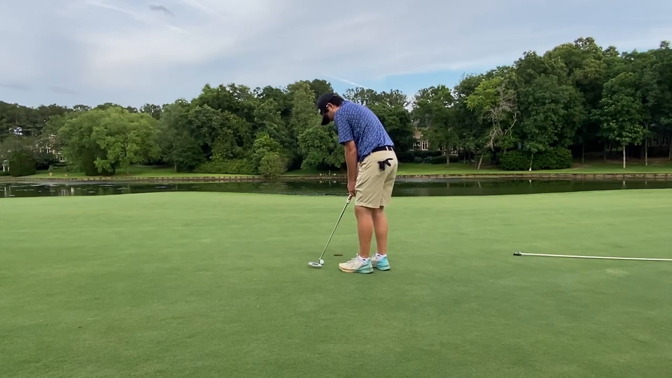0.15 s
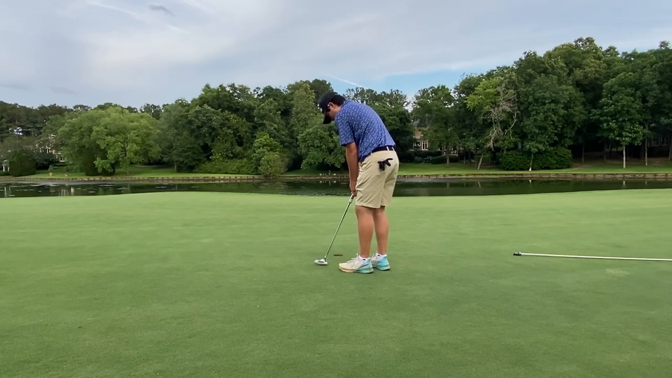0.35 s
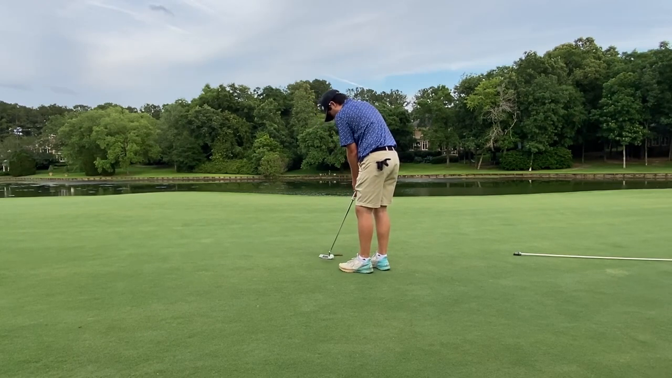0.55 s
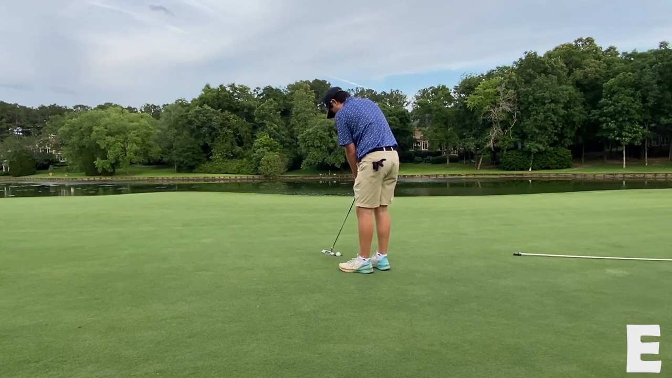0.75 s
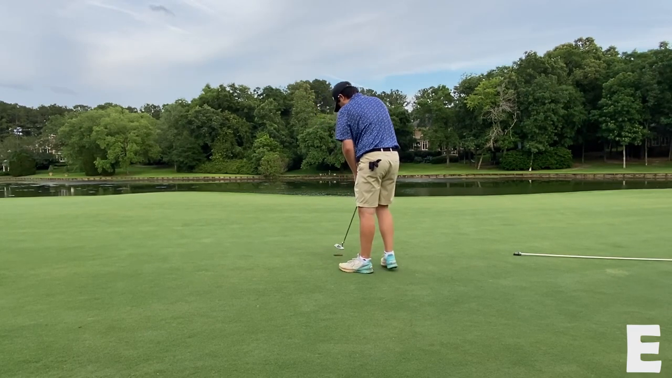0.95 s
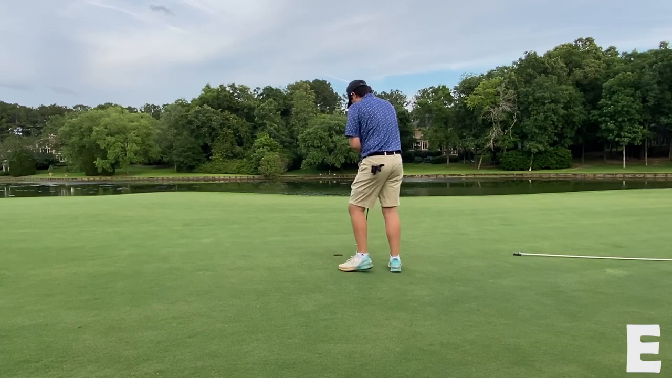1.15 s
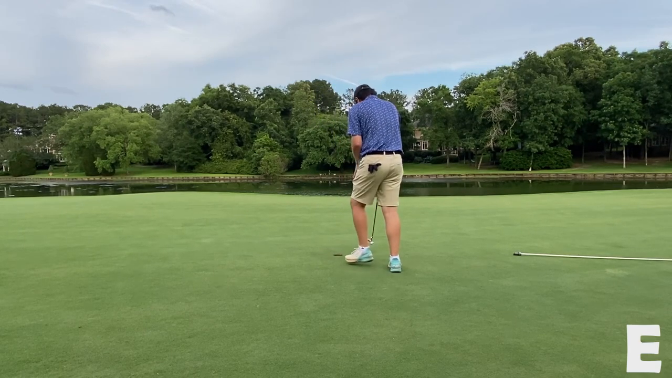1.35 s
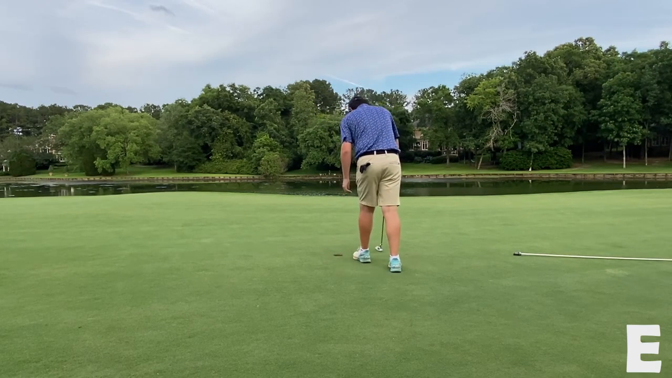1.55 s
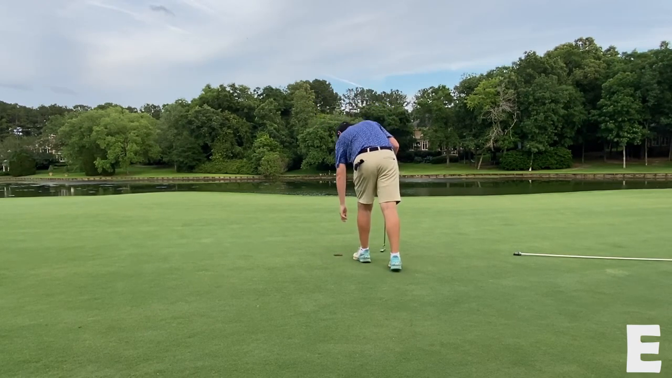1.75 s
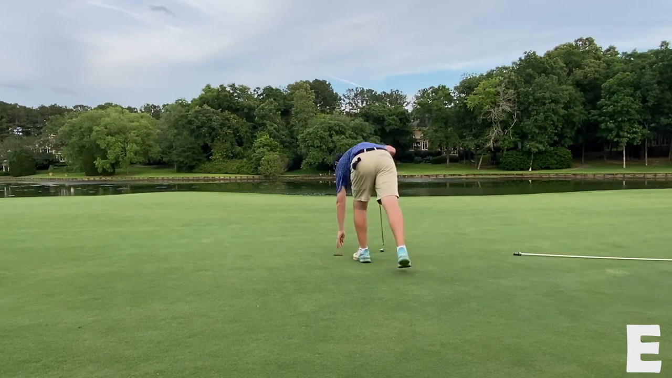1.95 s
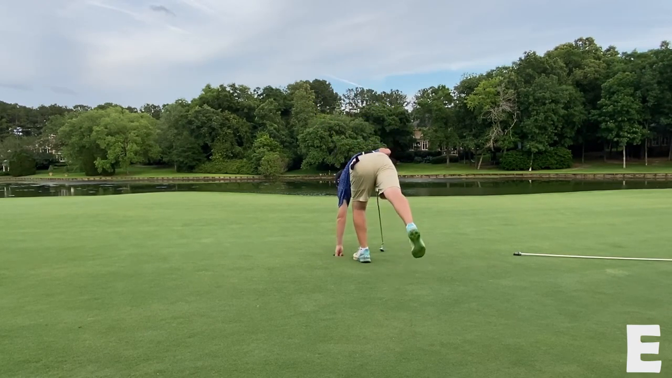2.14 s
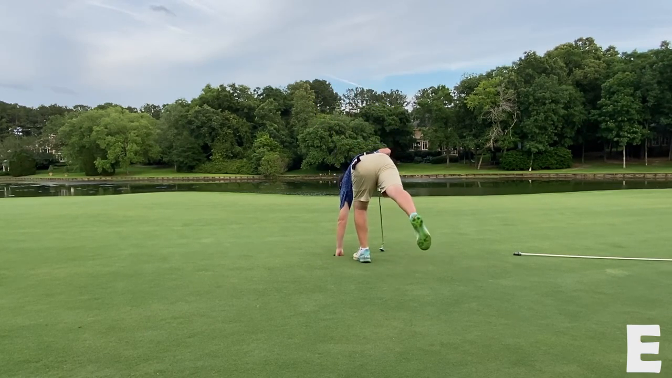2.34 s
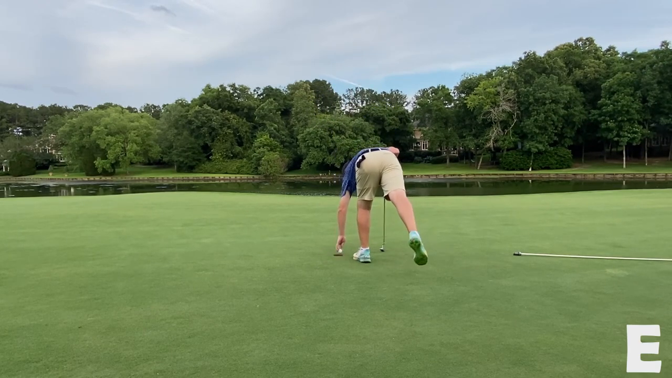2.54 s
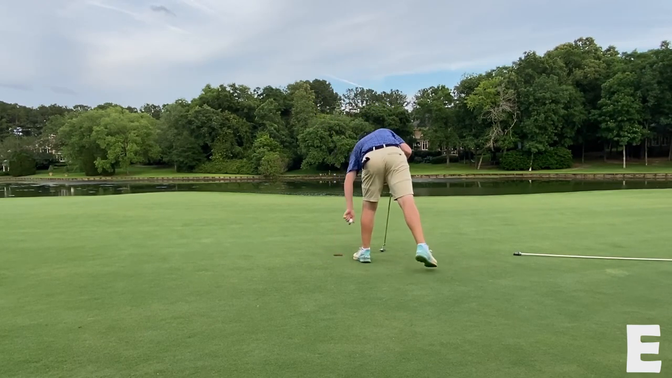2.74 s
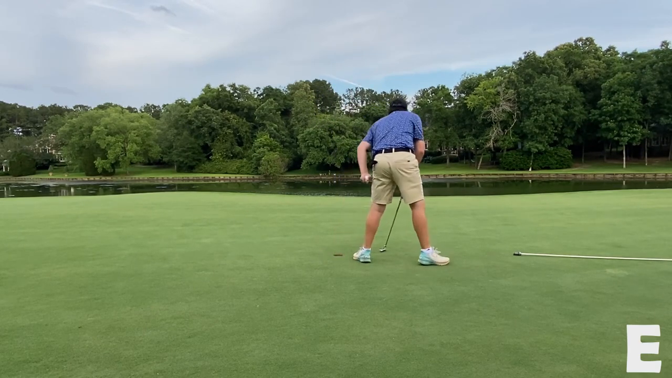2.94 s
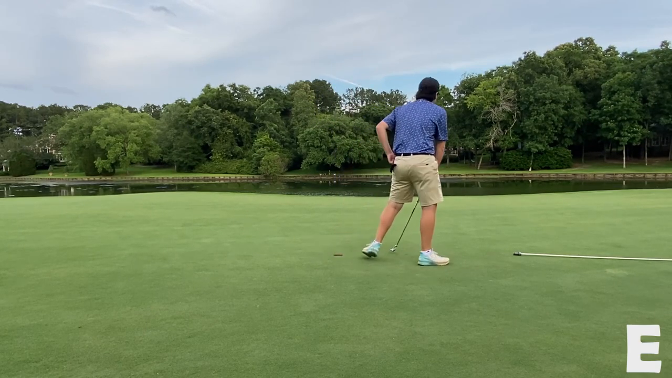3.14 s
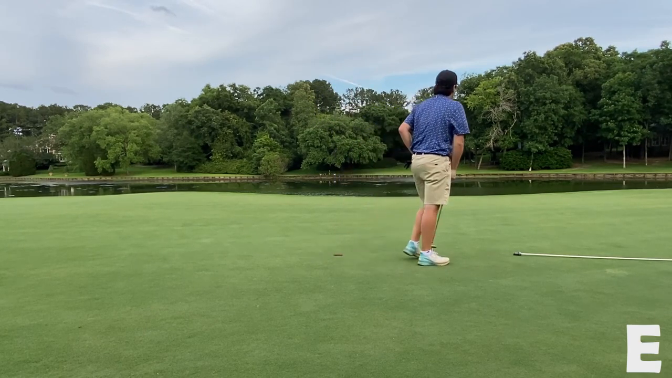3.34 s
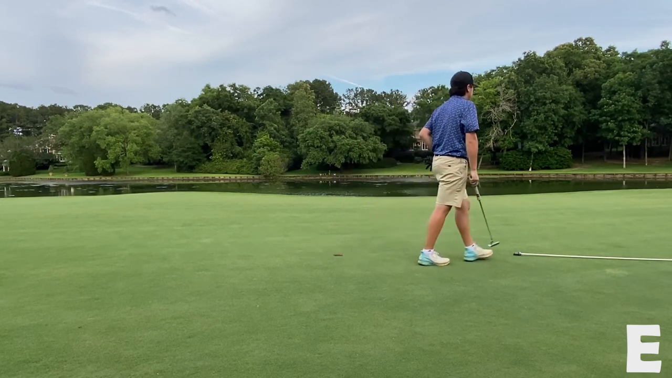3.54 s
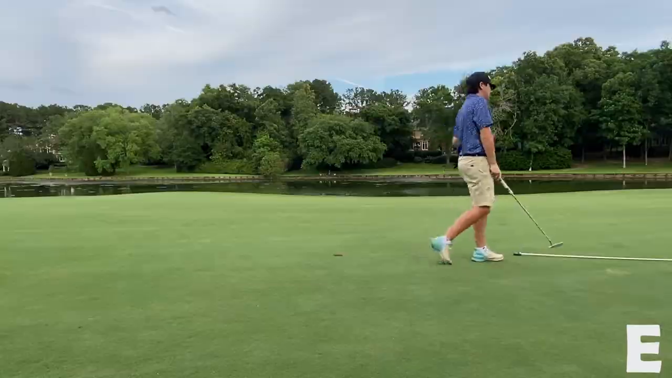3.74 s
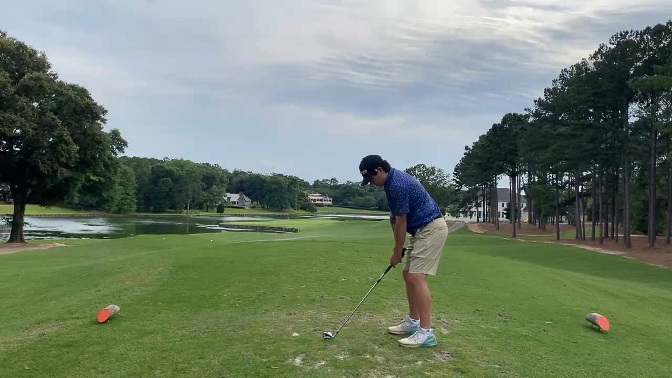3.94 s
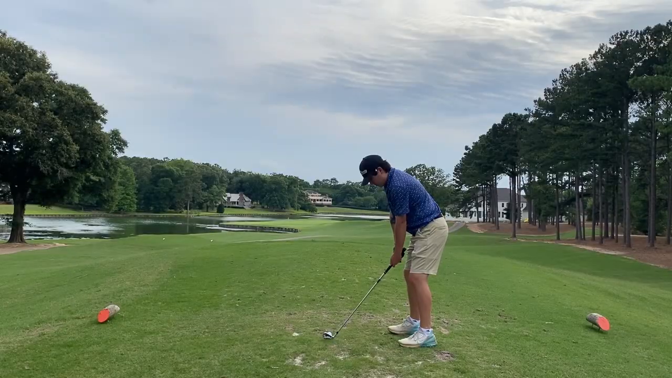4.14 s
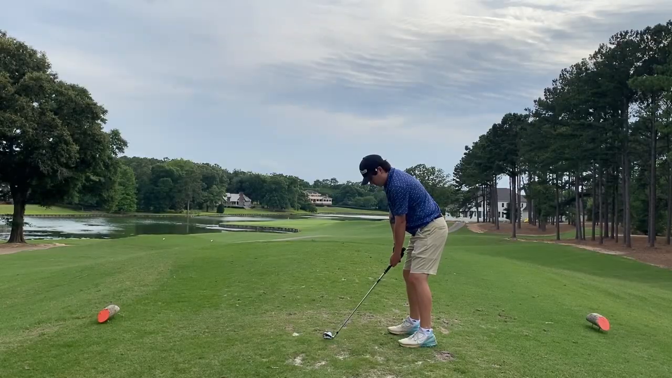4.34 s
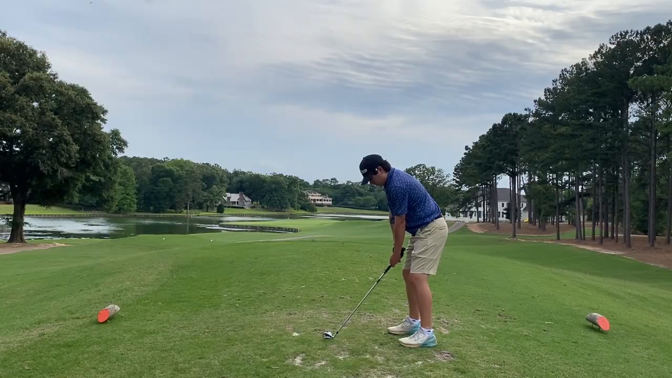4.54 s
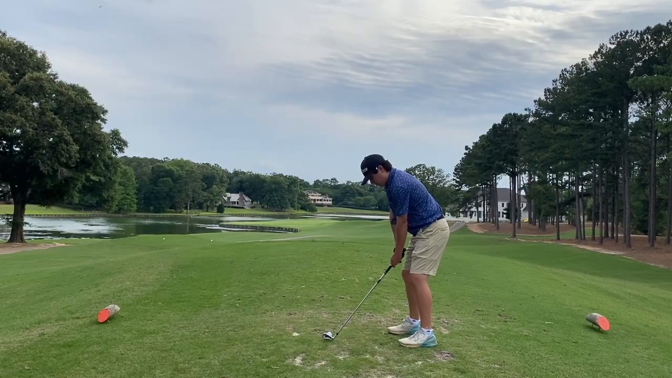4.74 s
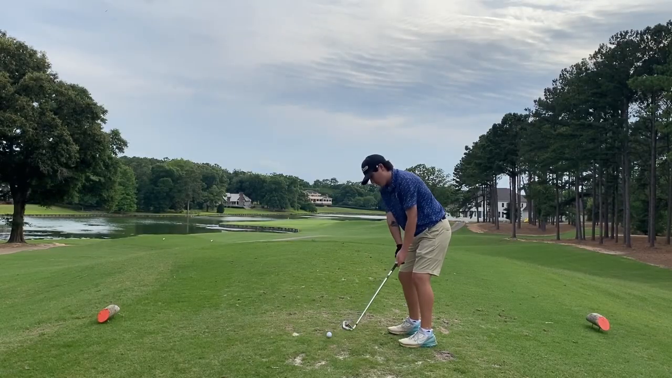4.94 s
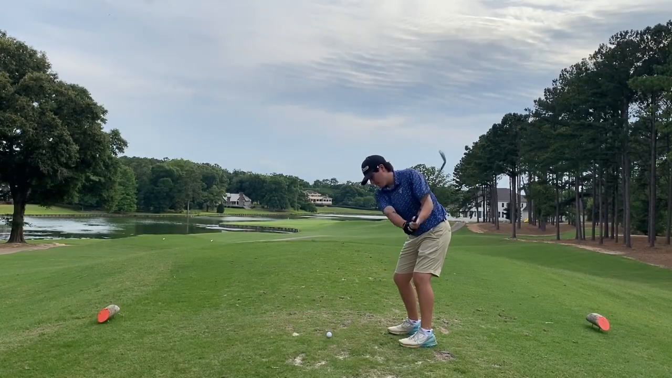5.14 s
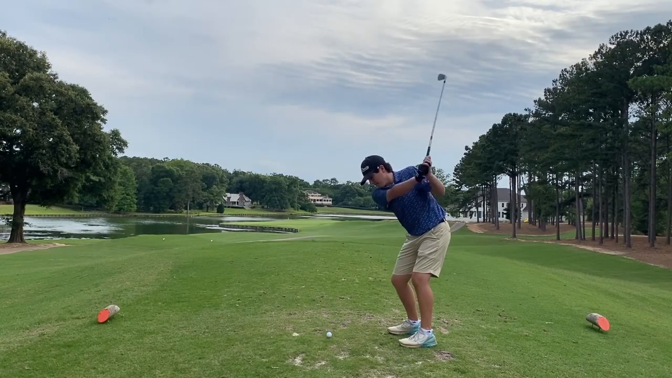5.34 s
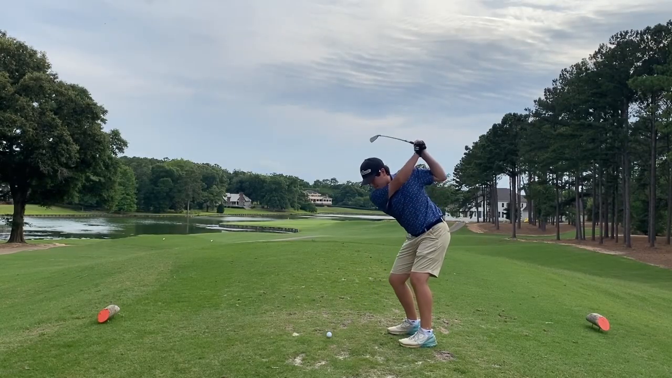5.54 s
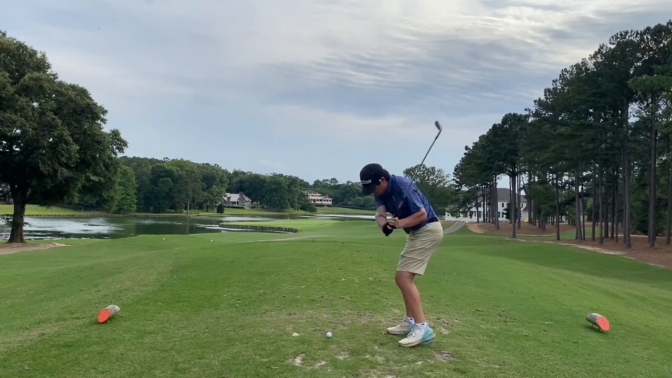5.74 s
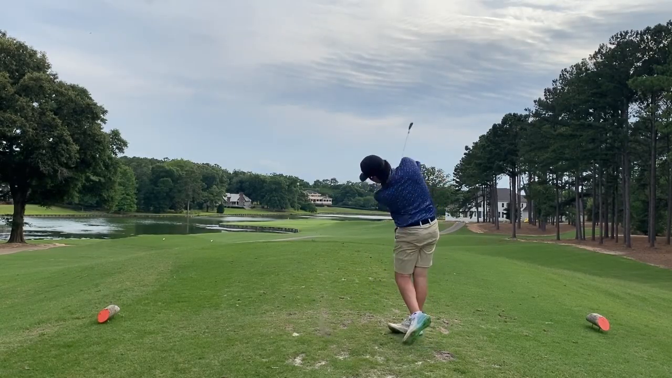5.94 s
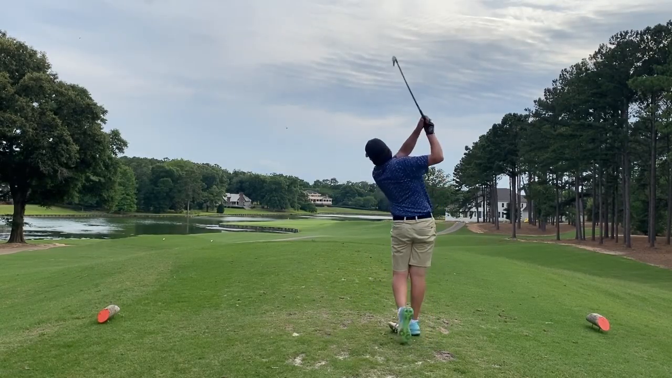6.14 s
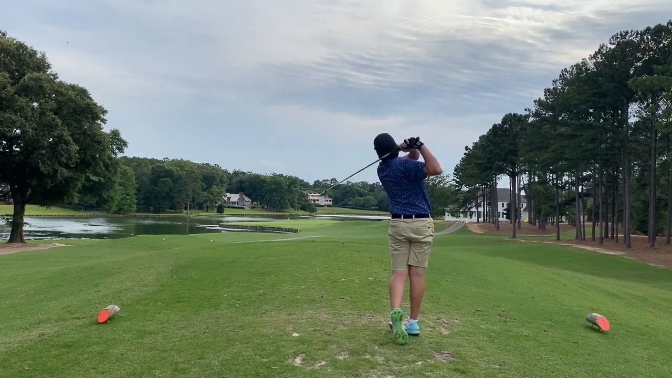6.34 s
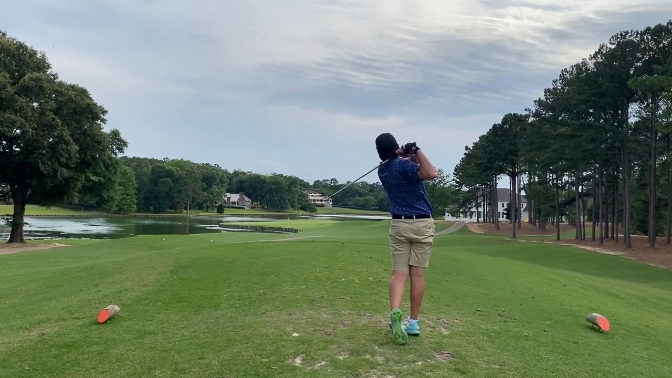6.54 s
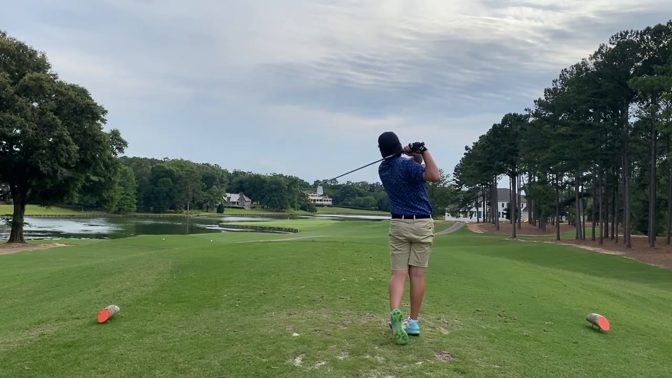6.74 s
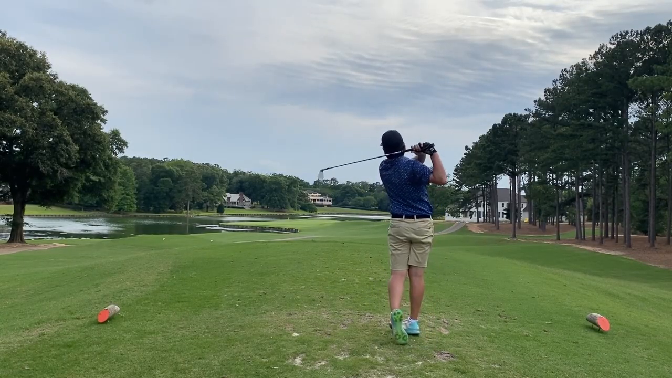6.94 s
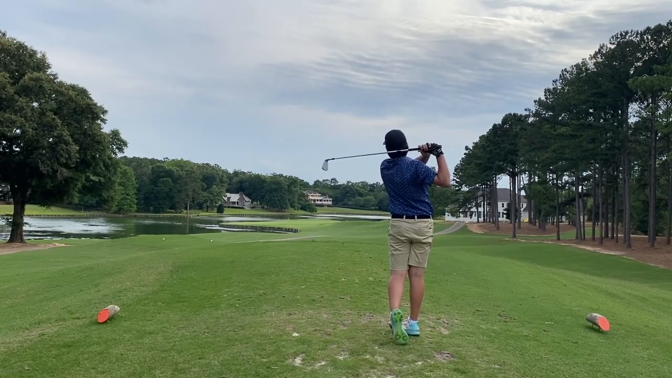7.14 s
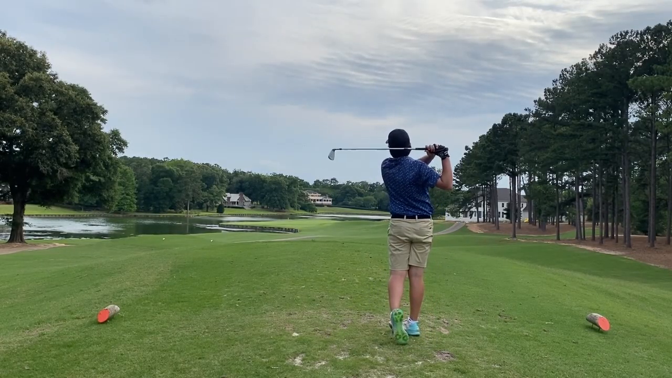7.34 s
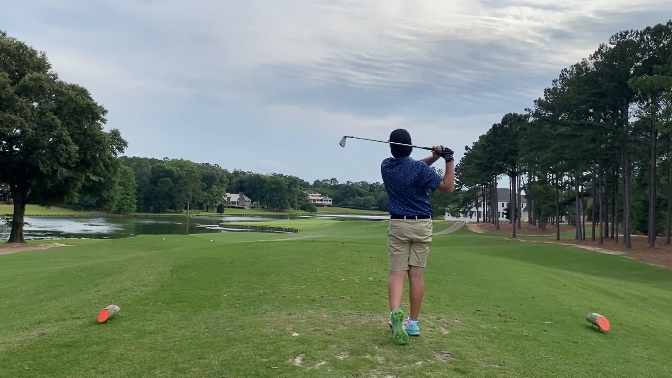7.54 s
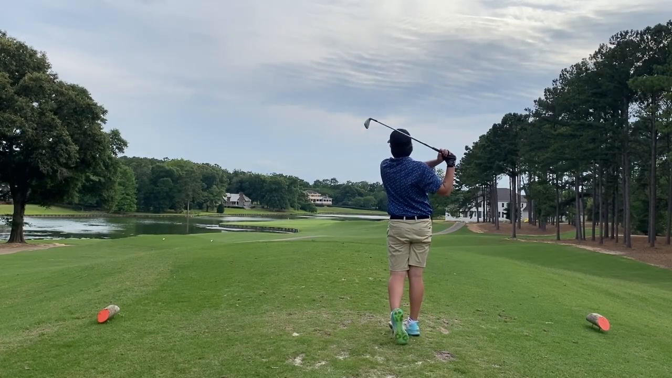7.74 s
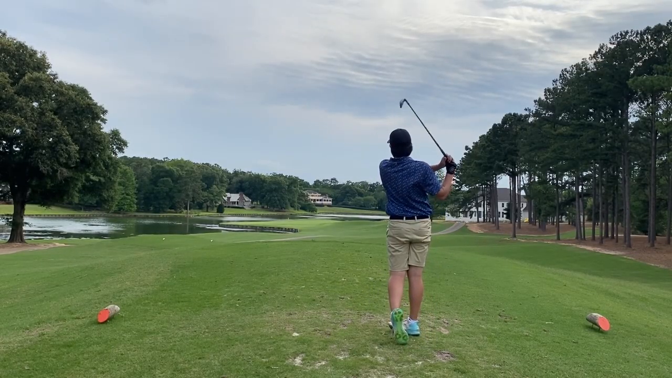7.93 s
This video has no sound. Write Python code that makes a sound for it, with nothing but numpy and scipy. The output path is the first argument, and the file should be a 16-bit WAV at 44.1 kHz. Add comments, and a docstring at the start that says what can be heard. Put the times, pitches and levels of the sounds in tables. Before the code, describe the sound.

A putt taps softly and the ball rattles into the cup over a mower's drone, then an iron swishes and cracks a ball on a windy tee.

```python
"""A far mower drones over distant traffic and small birds on a golf green, all of it filtered noise and gliding tones.
A putt is tapped and the ball rattles into the cup: each contact strikes a set of decaying modes.
Then, on a tee, wind buffets the microphones as low noise and thumps, while birds and a far trill go on.
An iron swishes down as swelling hiss, cracks the ball as ringing modes and torn noise, and sprays turf."""
import sys
import numpy as np
from scipy import signal
from scipy.fft import rfft, irfft, next_fast_len
from scipy.io import wavfile
from scipy.ndimage import uniform_filter1d

SR = 44100
rng = np.random.default_rng(int(sys.argv[2]) if len(sys.argv) > 2 else 0)


def to_wav(sig):
    """Store sig (one row per channel, or 1-D mono) as 16-bit WAV at the path in sys.argv[1].

    Samples outside -1..1 are clipped; the rate is SR.
    """
    pcm = np.clip(np.atleast_2d(sig), -1, 1) * 32767
    pcm = np.round(pcm).astype(np.int16)
    wavfile.write(sys.argv[1], SR, pcm.T)  # frames by channels


def gain_from_decibels(decibels):
    """Convert decibel values to linear amplitude factors."""
    exponent = np.asarray(decibels, float) / 20
    return 10 ** exponent


N = 352125
T = np.arange(N) / SR
SIDES = np.array([[1], [-1]])  # left, right
MOVE_S = 3.8598  # from green to tee

# Spectra of the distant air, one table for the green and one for the tee.
# Each row: frequency in Hz, relative density in dB per Hz.
AIR_SPECTRA = [
    [(18, -48), (30, -17.5), (59, -7), (102, -1), (153, -12), (220, -16), (309, -20.5), (536, -28.5),
     (1000, -27.5), (2130, -41.5), (3980, -46), (7400, -58.5), (9000, -70), (11500, -64.5), (12300, -81)],
    [(18, -33.5), (30, -9.5), (55, -5), (102, 1), (301, -18), (821, -19.5), (1390, -31.5), (2600, -36),
     (4400, -42.5), (7640, -56.5), (8900, -67), (10300, -55.5), (11700, -59.5), (12300, -87)],
]
# Levels of that air on the green and on the tee, in dB.
AIR_LEVELS_DB = [-51, -54]
# Stereo width of that air, one table for each place. Each row: frequency in Hz, side minus mid in dB.
AIR_WIDTHS = [
    [(60, -11.5), (110, -10.5), (200, -5), (380, -0.5), (700, 4), (1290, 2), (2380, 0), (4400, 0),
     (8120, 1), (15000, -6)],
    [(60, -8.5), (110, -13.5), (200, -5.5), (380, -2.5), (700, 6), (1290, 7.5), (2380, -2.5), (4400, -5.5),
     (8120, 3), (15000, -4.5)],
]
# Engine orders of the far mower. Each row: frequency in Hz, width in Hz, relative level in dB.
MOWER_ORDERS = [(56, 6.2, -6.5), (73.15, 5.2, -4.5), (101.5, 9.1, -2), (121.4, 7.6, -8), (140.9, 17, -14),
                (203.6, 8, -17.5)]
# Level of the far mower's drone, rough and uneven. Each row: time in seconds, level in dB.
MOWER_LEVEL = [(0.0, -47.5), (0.21, -50.5), (0.33, -42), (0.39, -54), (0.65, -46), (1.84, -46.5),
               (1.86, -41), (2.01, -49), (3.01, -48.5), (3.02, -55.5), (3.36, -44.5), (3.51, -48.5),
               (3.57, -41.5), (3.86, -51)]
# Wind gusts. Each row: time of the peak in seconds, peak in dB, length in seconds.
WIND_GUSTS = [(3.89, -43.5, 0.088), (4.22, -42.5, .04), (4.35, -44, 0.085), (4.44, -41.5, 0.082),
              (4.64, -41.5, 0.084), (4.92, -53, .15), (5.16, -46.5, .07), (5.31, -43, 0.15),
              (5.46, -40.5, .05), (5.6, -43, 0.26), (5.69, -41.5, .05), (6.44, -44, .07), (6.54, -46, .06),
              (6.67, -44.5, .06), (6.88, -44.5, .16), (7.08, -50, .05), (7.29, -46.5, 0.079),
              (7.4, -42.5, 0.053), (7.47, -43.5, .05), (7.6, -50, .12), (7.72, -47, .08),
              (7.83, -32, 0.084), (7.98, -37, 0.064)]
# Sharp buffets. Each row: start in seconds, peak in dB, pitch in Hz, left minus right in dB.
WIND_THUMPS = [(3.963, -37, 146, -2), (4.213, -36, 62.4, 6), (4.434, -44.5, 230, 4), (4.617, -35, 56, -3),
               (4.623, -40.5, 260, 0), (5.674, -33.5, 60, 0), (7.819, -31, 186, 1), (7.83, -25, 255, 4.5),
               (7.837, -27, 95, -2), (7.961, -38, 109, 0)]
# Small birds' whistles. Each row: start in seconds, length in seconds, lowest pitch in Hz,
# fall at the start in Hz, lift at the end in Hz, level in dB.
WHISTLE_NOTES = [(.305, 0.2, 4540, 299.5, 90, -81.5), (.5, 0.22, 4560, 170, 300, -78.5),
                 (.56, .165, 4160, 219, 190, -79), (.79, .11, 4190, 120, 40, -86),
                 (.72, .18, 4560, 150, 30, -88), (2.501, .14, 3960, 126, 60, -79),
                 (2.681, .22, 3950, 60, 30, -86), (3.096, .022, 7350, -900, 50, -82),
                 (3.489, .18, 4590, 290, 110, -74.5), (3.663, 0.2, 4580, 270, 230, -71),
                 (3.735, 0.14, 4140, 230.5, 90, -73), (4.615, .1, 4660, 120, 30, -82),
                 (4.71, .08, 4640, 60, 120, -78.5), (4.79, 0.12, 4660, 30, 30, -83),
                 (4.875, .07, 4180, 40, 20, -74), (4.885, .13, 4830, 850, 0, -88),
                 (4.95, .1, 4240, 30, 20, -84), (5.11, .06, 4220, 20, 20, -87),
                 (5.15, .07, 4660, 100, 0, -84), (5.24, .085, 4660, 30, 80, -83),
                 (5.18, .22, 4200, 30, 20, -92), (5.41, .075, 4220, 40, 20, -82),
                 (5.478, .08, 4230, 20, 20, -89)]
# Harsh chips, blurred chatter and, at 6.1 s, a fleck of turf spray. Each row: start in seconds, level in dB,
# centre in Hz, width in Hz, length in seconds.
CHIPS_AND_FLECK = [(0.487, -67.5, 5000, 1200, 0.064), (0.696, -62.5, 4800, 990, 0.053),
                   (0.913, -64, 4820, 1100, 0.056), (2.322, -79, 4470, 600, 0.16),
                   (3.687, -78.5, 2940, 250, 0.16), (3.843, -80.5, 7000, 800, 0.23),
                   (3.973, -80.5, 4620, 900, 0.15), (4.7, -86.5, 4800, 700, 1.1),
                   (5.207, -85, 6200, 1000, 0.14), (6.1, -71, 3550, 300, .22),
                   (6.62, -76, 2860, 299, 0.046), (6.94, -80, 3350, 200, .06),
                   (7.19, -81, 3500, 200, 0.052), (7.489, -81, 3540, 250, 0.064),
                   (7.688, -77, 3550, 200, 0.044), (7.907, -76, 1810, 300, 0.12)]
# Chirps of the far trill. Each row: start in seconds, relative level in dB, held pitch in Hz,
# climb in Hz (negative falls).
TRILL_CHIRPS = [(3.15, -80, 3100, 1), (3.21, -81, 3100, 0.5), (3.3, -81, 2950, 0), (3.335, -83, 2950, 0),
                (3.43, -80, 2630, 0), (3.51, -79, 2680, 0), (3.59, -77, 2660, 0), (3.67, -75, 2700, 0),
                (3.74, -72, 2660, -0.5), (3.82, -74, 2660, 0), (4.53, -84, 2650, 300),
                (4.77, -81, 2550, 300), (5.02, -82, 2540, 300.5), (5.305, -78, 2680, -150),
                (5.57, -83, 2680, 200), (6.31, -74, 2580, 200), (6.555, -74, 2697, 500),
                (6.845, -75, 2640, 300.5), (6.93, -78, 2600, 100), (7.09, -79, 2580, 100),
                (7.18, -77, 2582, 0), (7.335, -73.5, 2600, 150), (7.42, -76, 2556, 50.5),
                (7.47, -78.5, 2540, 0.5), (7.585, -74, 2610, 200), (7.68, -78, 2555, 0.5),
                (7.73, -79, 2580, 0.5), (7.825, -72, 2620, 250), (7.93, -77.5, 2520, 0)]
# Shoes and cloth on the grass. Each row: time of the peak in seconds, level in dB, length in seconds.
RUSTLES = [(.87, -101, .1), (1.07, -85, .04), (1.22, -91, .1), (1.41, -91, .04), (1.59, -94, .03),
           (1.86, -91.5, .1), (2.0, -89.5, 0.22), (2.22, -93, .1), (2.9, -100, .4), (3.17, -90, .06),
           (3.46, -89, .05), (3.65, -90, .06), (3.83, -96, .1)]
# Crumbs of turf landing. Each row: start in seconds, peak of each mode in dB.
TURF_CRUMBS = [(5.992, -51), (6.069, -53), (6.132, -49), (6.167, -51), (6.215, -55)]
# Putter meeting ball. Each row: start in seconds, level in dB.
PUTT_TAPS = [(0.4116, -35.5)]
# Modes of the putter. Each row: frequency in Hz, relative level in dB, decay by 60 dB in seconds.
PUTTER_MODES = [(900, 6.5, 0.003), (1560, -34, 0.005), (2500, -12.5, 0.0058), (3500, -16, 0.0082)]
# Ball bouncing in the cup. Each row: start in seconds, level in dB, brightness in dB per octave.
CUP_BOUNCES = [(0.887, -48, -10), (0.955, -32.5, 1), (0.969, -49, -6), (1.018, -55.5, 9.5),
               (1.024, -51, -6), (1.1163, -40, 5), (1.199, -43, 0), (1.291, -43, -4), (1.337, -44, -7),
               (1.397, -47.5, -7), (1.444, -51, -10), (1.478, -53, -4)]
# Modes of the cup. Each row: frequency in Hz, relative level in dB, decay by 60 dB in seconds.
CUP_MODES = [(427, -5.5, 0.052), (477, 3.0, 0.033), (592, 3, 0.014), (727, -4, 0.022), (990, -8.5, 0.018),
             (2220, -28.5, 0.0053), (3350, -34, 0.01)]
# Spectrum of the hiss of the downswing and the turf. Each row: frequency in Hz, # relative density in dB per
# Hz.
SWISH_SPECTRUM = [(590, -35.5), (1000, -3), (2240, -0.5), (4590, -7.5), (7630, -14.5), (8180, -17),
                  (8670, -46), (9620, -26), (10300, -17), (11800, -17), (13000, -45), (14100, -25),
                  (15600, -23.5), (16100, -60)]
# Early echo in the spray, one row: time of the peak in seconds, level in dB, length in seconds.
SPRAY_ECHO = (5.953, -58, .03)
# Iron on ball, then turf and ground echo. Each row: start in seconds, level in dB, treble in dB per octave.
IRON_BLOWS = [(5.9056, -12.5, 1), (5.908, -18.0, 0), (5.9095, -21.5, -4)]
# Modes of head and ball. Each row: frequency in Hz, relative mid level in dB, relative side level in dB,
# decay by 60 dB in seconds.
IRON_MODES = [(186, -18, -34.5, .04), (380, -7.5, -36.5, 0.021), (560, -9.5, -37.5, 0.018),
              (890, -9, -33, 0.0072), (1110, -10, -31, 0.017), (1420, 0, -27, 0.0098),
              (1760, -2.5, -25, 0.0088), (2160, 5.5, -14.5, 0.0043), (2800, -5, -15, 0.0029),
              (3500, -5, -21.5, 0.008), (4200, -24, -20.5, 0.0039), (4780, -7, -21.5, .008),
              (5560, -1.5, -21.5, .008), (7300, -3, -6.5, .004), (8870, -22.5, -6, .007),
              (10760, -7, -12, .005), (11800, -16, -16, 0.0045), (15500, -16, -19, .005)]


def curve(rows, col=1):
    """Interpolation: a table column becomes a function of time, -150 outside the table."""
    rows = np.array(rows, float)
    return np.interp(T, rows[:, 0], rows[:, col], left=-150, right=-150)


def smooth(db):
    """Averaging over 10 ms rounds the edges of a gain."""
    return uniform_filter1d(gain_from_decibels(db), size=441)


def shaped(gain_at):
    """Spectral shaping: white noise takes a given gain over frequency, then is scaled to rms 1."""
    size = next_fast_len(N)
    hz = np.arange(1, size // 2 + 2) * SR / size
    x = irfft(rfft(rng.standard_normal(size)) * gain_at(hz), size)[:N]
    return x / x.std()


def band(hz, width, order=1):
    """Resonance: noise of rms 1 concentrated about one frequency; a higher order has steeper skirts."""
    return shaped(lambda f: 1 / (1 + ((f - hz * hz / f) / width) ** 2) ** order)


def read(table, hz):
    """A spectrum in dB is interpolated along a logarithmic frequency axis."""
    table = np.array(table, float)
    return np.interp(np.log(hz), np.log(table[:, 0]), table[:, 1])


def walk(rate):
    """Slow fluctuation: random levels held for 1 / rate seconds and averaged twice, spread near 1."""
    k = int(SR / rate)
    held = np.repeat(rng.standard_normal(N // k + 1), k)
    return 1.3 * uniform_filter1d(uniform_filter1d(held, k), k)[:N]


def bumps(rows):
    """Incoherent addition: each gain swells to its peak and dies away, and the powers add."""
    power = 0
    for s, db, length in rows:
        power = power + gain_from_decibels(2 * db) / np.cosh(np.clip(4 * (T - s) / length, -30, 30)) ** 2
    return np.sqrt(power)


def ring(s, hz, db, t60, rise, phase=0):
    """Modal decay: one mode struck at s, its envelope peaking at db; a softer contact rises more slowly."""
    out, i = np.zeros(N), int(s * SR)
    t = T[:min(int(2 * (t60 + rise) * SR), N - i)]
    shape = gain_from_decibels(-60 * t / t60) * (1 - np.exp(-t / rise)) ** 2
    out[i:i + len(t)] = gain_from_decibels(db) * shape / shape.max() * np.sin(2 * np.pi * hz * t + phase)
    return out


def air():
    """Diffuse sound: far traffic and leaves are noise, wide in the middle range and coloured by each place."""
    out = 0
    hz = np.linspace(10, SR / 2, num=4000)
    places = (T < MOVE_S, T >= MOVE_S)
    for spectrum, db, width, here in zip(AIR_SPECTRA, AIR_LEVELS_DB, AIR_WIDTHS, places):
        gain = lambda f: gain_from_decibels(read(spectrum, f))
        side_gain = lambda f: gain(f) * gain_from_decibels(read(width, f))
        # total side power over total mid power
        side_db = 10 * np.log10(np.sum(side_gain(hz) ** 2) / np.sum(gain(hz) ** 2))
        mid = shaped(gain)
        side = gain_from_decibels(side_db) * shaped(side_gain)
        out = out + here * gain_from_decibels(db + 1.4 * walk(2.5)) * (mid + SIDES * side)
    return out


def mower():
    """Engine orders, blurred by distance and air into narrow bands, each swell alone, a little to the left."""
    def orders():
        return sum(gain_from_decibels(db + 1.6 * walk(3)) * band(hz, width) for hz, width, db in MOWER_ORDERS)

    drone = gain_from_decibels(0.7 * SIDES) * orders() + gain_from_decibels(-15) * SIDES * orders()
    waver_db = 1.5 * walk(9)
    return smooth(curve(MOWER_LEVEL) + waver_db) * drone / drone.std()


def wind():
    """Turbulence: eddies press on the ports as a restless rumble with gusts, the sharpest as single thumps."""
    steady_db, wander_db, top_hz = -56, 5, 112
    rumble = 0
    for hz in (45, 70, 110, 170, 270):
        gain = gain_from_decibels(walk(13)) / (1 + (hz / top_hz) ** 3)
        rumble = rumble + gain * (band(hz, hz * 0.6) + gain_from_decibels(-11) * SIDES * band(hz, hz * 0.6))
    pressure = np.hypot(gain_from_decibels(steady_db + wander_db * walk(14)), bumps(WIND_GUSTS))
    out = rumble / rumble.std() * (T >= MOVE_S) * pressure
    for s, db, hz, pan_db in WIND_THUMPS:
        # decay and rise scale with the period
        out = out + gain_from_decibels(SIDES * pan_db / 2) * ring(s, hz, db, 4.1 / hz, 0.5 / hz)
    return out


def rustle():
    """Friction: shoes and cloth on the grass give brief swells of high noise."""
    def cloth():
        return band(10750, 2400, order=2) + gain_from_decibels(2) * band(6500, 3000)

    return bumps(RUSTLES) * (cloth() + 0.54 * SIDES * cloth())


def whine():
    """Pure tone: a faint steady whine on the tee."""
    hz, rms_db = 9975, -93.5
    return (T >= MOVE_S) * gain_from_decibels(rms_db) * np.sqrt(2) * np.sin(2 * np.pi * hz * T)


def trill():
    """Frequency modulation: each chirp glides to its held pitch and wavers out, half blurred by distance."""
    rise_s, attack_s, fade_s = 0.025, 0.012, 0.035
    out = 0
    waver_hz = 18 * walk(25) + 25 * walk(150)
    blur = 0.3 * band(2613, 200) + 0.43 * SIDES * band(2620, 200)
    for s, db, hz, climb_hz in TRILL_CHIRPS:
        after = np.maximum(T - s, 0)
        pitch = hz - climb_hz * np.exp(-after / rise_s) + waver_hz
        pipe = np.sin(2 * np.pi * np.cumsum(pitch) / SR)
        same_place = (T < MOVE_S) == (s < MOVE_S)
        shape = (1 - np.exp(-after / attack_s)) * np.exp(-after / fade_s) * same_place
        out = out + gain_from_decibels(db + 10) * shape * (pipe + blur)
    return gain_from_decibels(2.5 * walk(30)) * out


def chips_and_fleck():
    """Band noise: harsh chips, chatter and one fleck of turf have a bright core in a wider rasp, and die away."""
    def rasp(hz, width):
        return band(hz, width / 3) + 1.15 * band(hz, 2 * width, order=2)

    out = 0
    for s, db, hz, width, length in CHIPS_AND_FLECK:
        u = np.clip((T - s) / length, 0, 9)
        shape = 3.4 * u * np.exp(1 - 3.7 * u)
        out = out + gain_from_decibels(db) * shape * (rasp(hz, width) + 0.5 * SIDES * rasp(hz, width))
    return out


def whistles():
    """Gliding tones curve down and up again; amplitude flutter splits the upper voice, and trees smear all."""
    lowest_at, edge = 0.55, 0.09  # shares of the note's length
    out = 0
    for s, length, hz, fall_hz, lift_hz, db in WHISTLE_NOTES:
        u = np.clip((T - s) / length, 0, 1)
        fall = fall_hz * np.maximum(1 - u / lowest_at, 0) ** 2
        lift = lift_hz * (np.maximum(u - lowest_at, 0) / (1 - lowest_at)) ** 2
        phase = 2 * np.pi * np.cumsum(hz + fall + lift + 22 * walk(90)) / SR
        flutter_depth = 0.79 * (4400 < hz < 6000)
        flutter_phase = 2 * np.pi * np.cumsum(250 + 25 * walk(30)) / SR
        flutter = 1 + flutter_depth * np.sin(flutter_phase)
        green = s < MOVE_S
        edges = np.clip(np.minimum(u, 1 - u) / edge, 0, 1) * ((T < MOVE_S) == green)
        swell = edges * gain_from_decibels(db + (2.5 if green else 3.5) * walk(60))
        out = out + np.sqrt(2) * swell * np.sin(phase) * flutter
    trees = rng.standard_normal((2, 9000)) * gain_from_decibels(-30 - 60 * T[:9000] / 0.38)
    echo = 0
    for here in (T < MOVE_S, T >= MOVE_S):  # echoes from the green do not carry over to the tee
        echo = echo + here * signal.fftconvolve((here * out)[None], trees, axes=1)[:, :N]
    return out * gain_from_decibels(SIDES * 4.7) + echo


def putt():
    """Impact: the tap rings the putter, then irregular bounces, closer together at the end, ring the plastic cup."""
    tap = 0
    for s, level_db in PUTT_TAPS:
        for hz, db, t60 in PUTTER_MODES:
            tap = tap + ring(s, hz, db + level_db, t60, 0.00025)
    cup = 0
    for s, level_db, bright_db in CUP_BOUNCES:
        for hz, db, t60 in CUP_MODES:
            tilt_db = bright_db * np.log2(hz / CUP_MODES[0][0])
            cup = cup + ring(s, hz, level_db + db + tilt_db, t60, 0.00084)
    return tap + gain_from_decibels(0.4 * SIDES) * cup


def clod():
    """Impact: a clod of turf lands as a click and a short noise, and crumbs patter before and after it."""
    after = np.maximum(T - 6.125, 0)
    thud = (after > 0) * gain_from_decibels(-53 - 60 * after / 0.11) * band(1300, 2700)
    out = ring(6.13, 11300, -56, 0.004, 0.0001) + thud
    for s, db in TURF_CRUMBS:
        for hz in (900, 2100, 3600):
            out = out + ring(s, hz, db, 0.0046, 0.0002)
    return out


def hiss():
    """Broadband noise in two channels, with its smoothed lower part alongside."""
    mid, side = [shaped(lambda f: gain_from_decibels(read(SWISH_SPECTRUM, f))) for _ in range(2)]
    full = mid + gain_from_decibels(-3) * SIDES * side
    return full, uniform_filter1d(full, size=9)


def swish():
    """Flow noise: the club gains speed until the blow, loudest as it passes closest, a low roar leading the hiss."""
    peak_s, level_db, swell_db_s2, fall_db_s = 5.877, -47.5, 6999, 120
    treble_lag_s = 0.0068  # the top of the hiss joins late
    roar_db, roar_lead_s, roar_climb_s = 0.5, 0.003, 0.064
    roar_swell_share = 0.65  # the roar swells more gently than the hiss

    def swell_db(s):
        return -swell_db_s2 * np.maximum(s - T, 0) ** 2 - fall_db_s * np.maximum(T - s, 0)

    full, low = hiss()
    whoosh = gain_from_decibels(swell_db(peak_s)) * low + gain_from_decibels(swell_db(peak_s + treble_lag_s) - 2) * (full - low)
    # the roar climbs in pitch by fading from a lower band to a higher one
    climb = np.pi / 2 * np.clip(1 - (peak_s - T) / roar_climb_s, 0, 1)
    roar = np.cos(climb) * band(380, 200) + np.sin(climb) * band(650, 700)
    roar_gain = gain_from_decibels(roar_db + roar_swell_share * swell_db(peak_s - roar_lead_s))
    # a faint hiss grows from earlier in the downswing
    lead_in = gain_from_decibels(-57 - 170 * np.maximum(peak_s - T, 0)) * band(1500, 2500)
    return (T < IRON_BLOWS[0][0]) * (gain_from_decibels(level_db) * (whoosh + roar_gain * roar) + lead_in)


def spray():
    """Granular noise: turf thrown up and falling back, with the echo from the trees, duller as it settles."""
    start_s, level_db, fade_db_s, steeper_db_s2 = 6.035, -55.5, 27, 29
    dulls_db_s, roar_db = 6, -7.5
    after = np.maximum(T - start_s, 0)
    rise_db = -70 * np.maximum(start_s - T, 0)
    fade_db = level_db - fade_db_s * after - steeper_db_s2 * after ** 2 + rise_db
    gain = np.hypot(smooth(fade_db + 0.4 * walk(30)), bumps([SPRAY_ECHO]))
    full, low = hiss()
    treble_db = 1.2 * walk(40) - dulls_db_s * after
    duller = gain_from_decibels(1.5 * walk(45)) * low + gain_from_decibels(treble_db) * (full - low)
    grains = gain_from_decibels(2.4 * walk(150))
    return (T >= IRON_BLOWS[0][0]) * gain * (grains * duller + gain_from_decibels(roar_db) * band(650, 700))


def iron():
    """Impact: each blow rings the same modes of head and ball and tears a short burst of noise."""
    rise_s, pan_db = 0.00006, 0.4
    out = 0
    for s, db, treble_db in IRON_BLOWS:
        for hz, mid_db, side_db, t60 in IRON_MODES:
            level_db = db + treble_db * np.log2(hz / 1000)
            out = out + ring(s, hz, level_db + mid_db, t60, rise_s)
            # a quarter-cycle offset between mid and side keeps left and right equally loud
            out = out + SIDES * ring(s, hz, level_db + side_db, t60, rise_s, phase=np.pi / 2)
        after = np.maximum(T - s, 0)
        tear = band(3000, 5000) + gain_from_decibels(-6) * SIDES * band(7000, 8000)
        out = out + (T >= s) * gain_from_decibels(db - 15 - 60 * after / 0.012) * tear
    return gain_from_decibels(SIDES * pan_db / 2) * out


def scene():
    """Superposition: all the sources add as they reach the two ports."""
    background = air() + mower() + wind() + rustle() + whine() + trill() + chips_and_fleck() + whistles()
    return background + putt() + clod() + swish() + spray() + iron()


def top_cut(x):
    """Nothing passes above the cut-off."""
    return signal.sosfilt(signal.butter(12, 17070, fs=SR, output="sos"), x)


def record(dry):
    """Dispersion: the phone's filters hold the lows back, so each blow falls in pitch, and cut both extremes."""
    size = next_fast_len(N + 4096)
    hz = np.arange(1, size // 2 + 2) * SR / size
    late = np.exp(-2j * np.pi * 1.7 * np.log((hz + 200) / (SR / 2)))  # delay 1.7 / (hz + 200) seconds
    edges = 1 / (1 + (40 / hz) ** 4) / (1 + (hz / 16300) ** 40)
    longer = np.pad(dry, ((0, 0), (0, size - N)), mode="reflect")
    filtered = irfft(rfft(longer) * late * edges, size)[:, :N]
    # the jump from green to tee is a small step that dies away
    step = (T >= MOVE_S) * gain_from_decibels(-40.5 - 60 * np.maximum(T - MOVE_S, 0) / 0.022)
    return top_cut(filtered + step)


dry = scene()
out = record(dry)
to_wav(out)
```